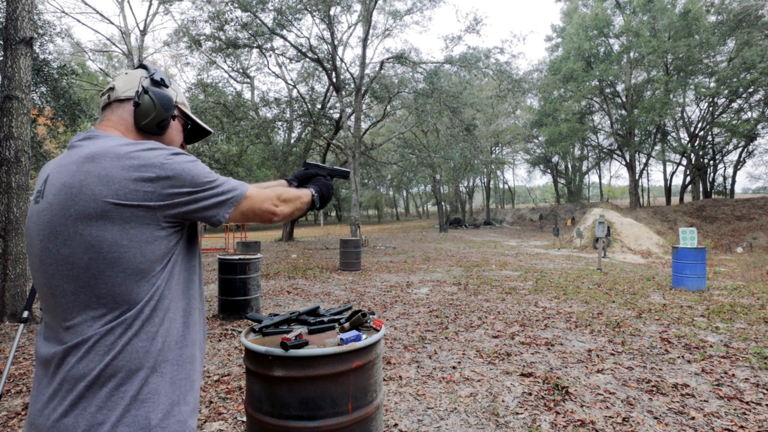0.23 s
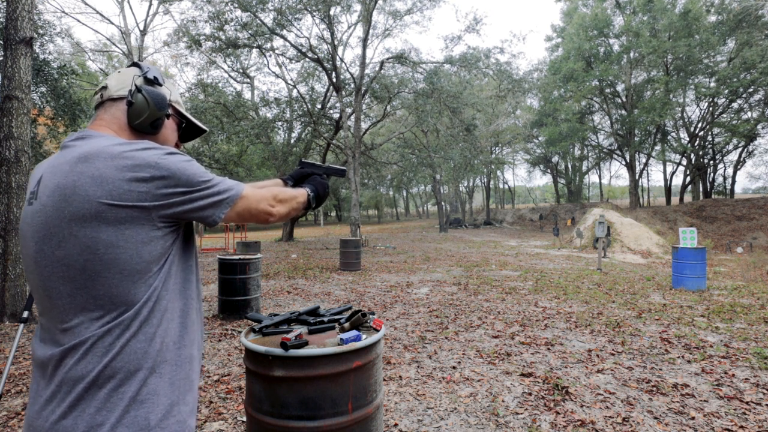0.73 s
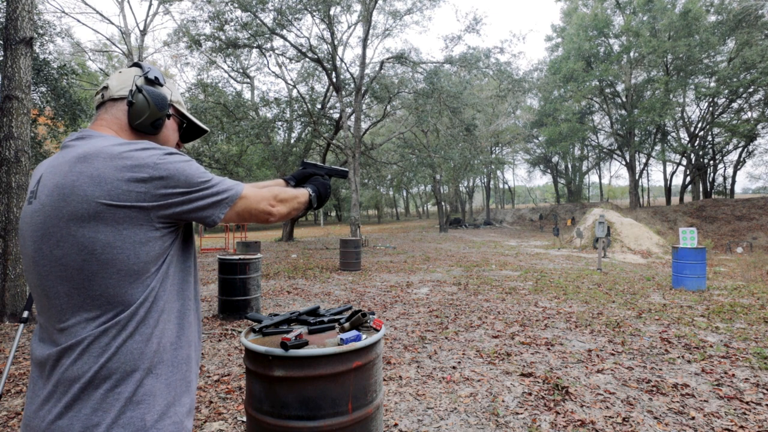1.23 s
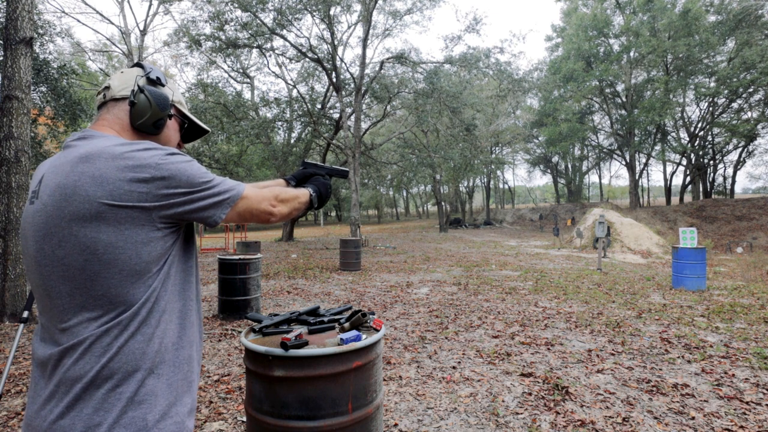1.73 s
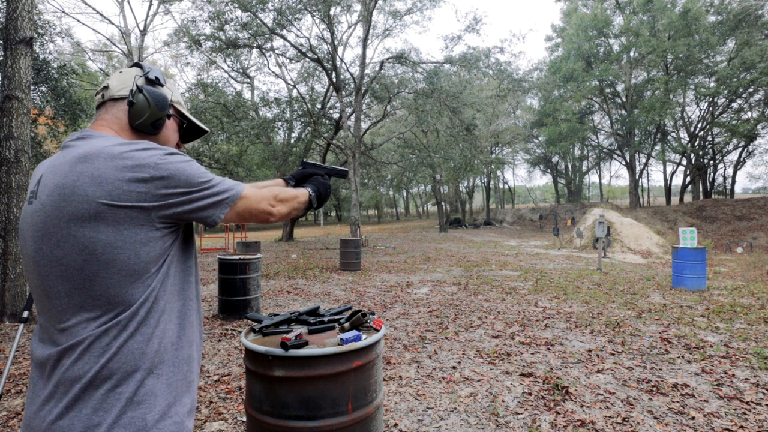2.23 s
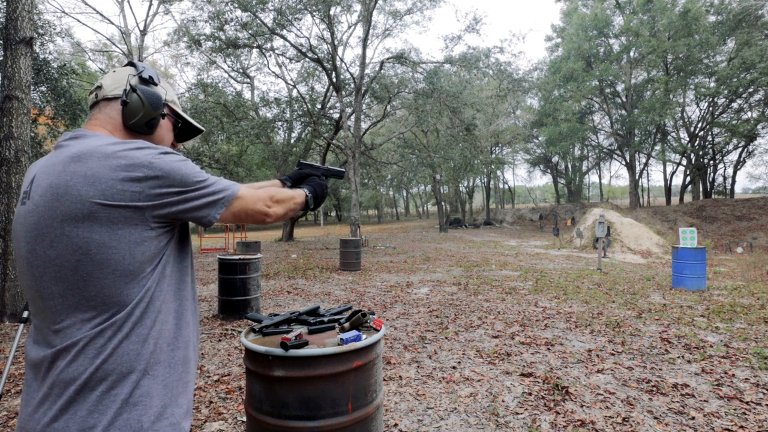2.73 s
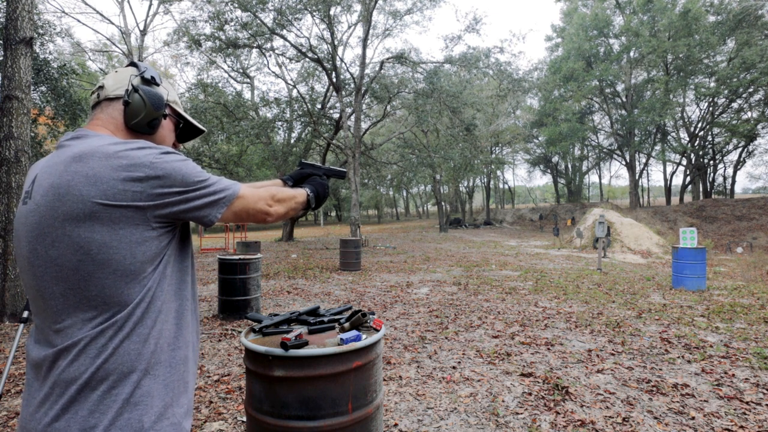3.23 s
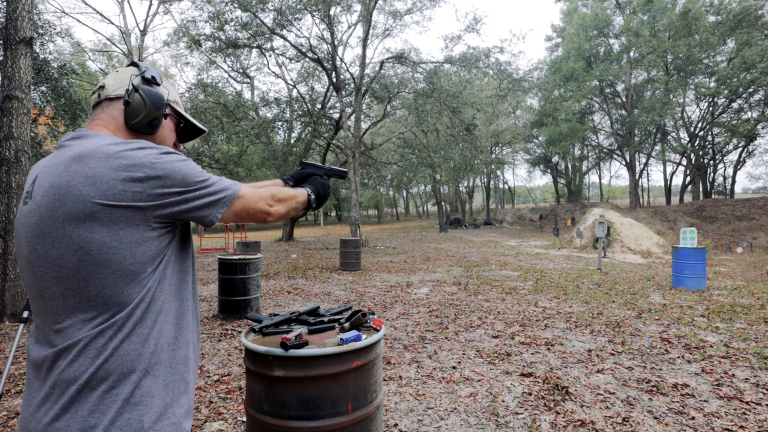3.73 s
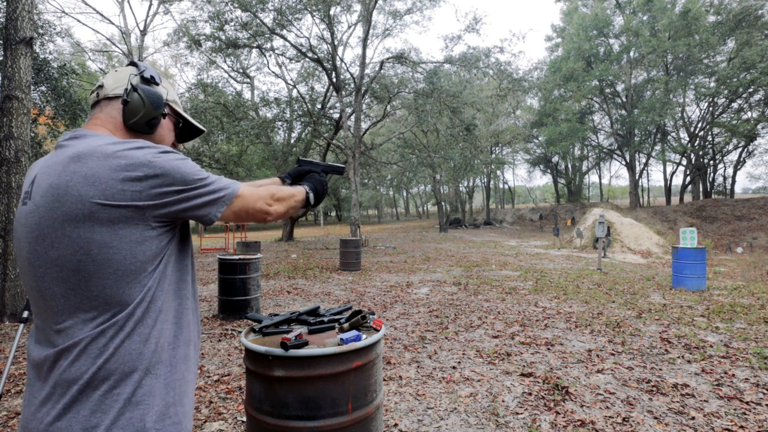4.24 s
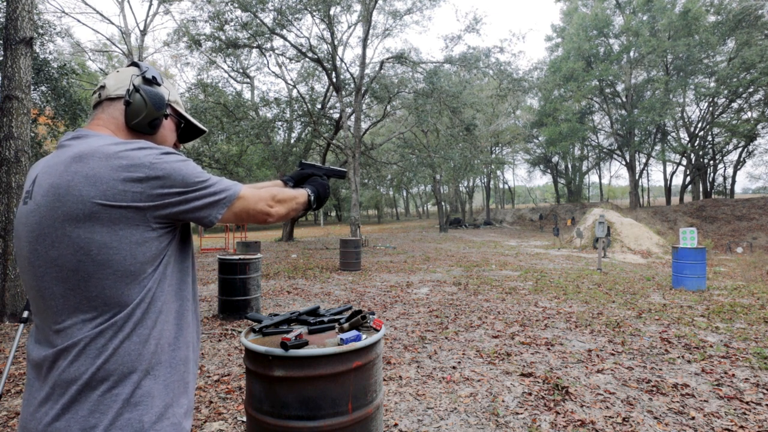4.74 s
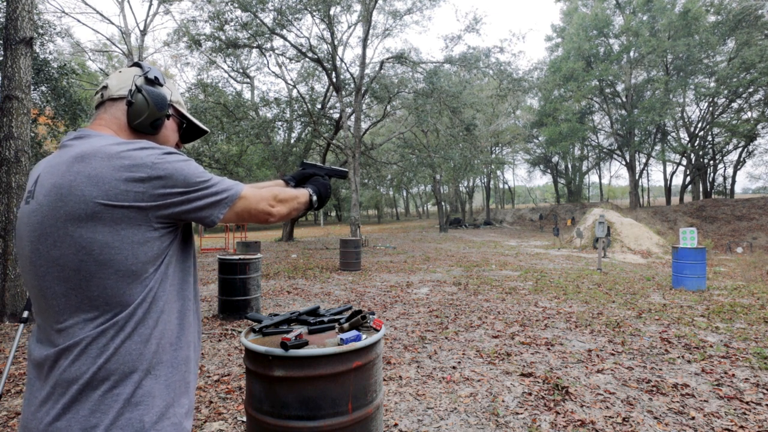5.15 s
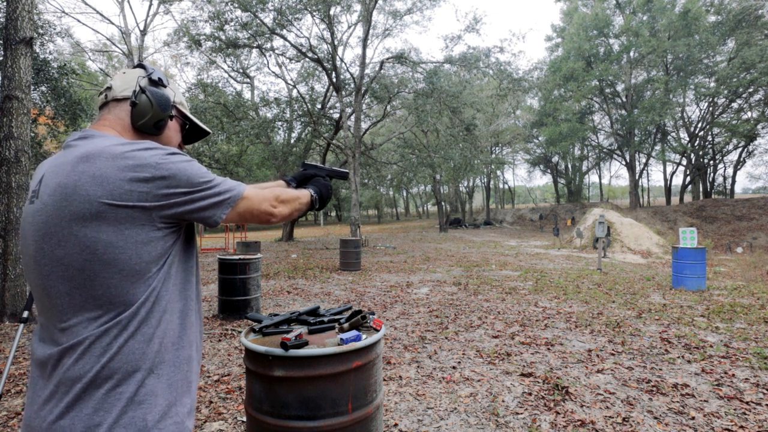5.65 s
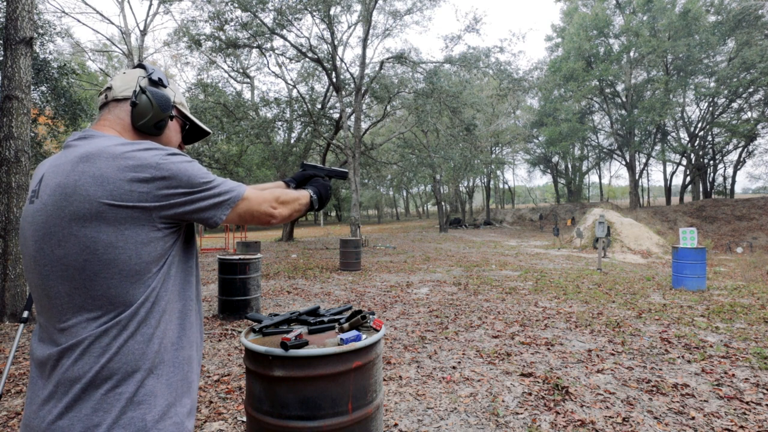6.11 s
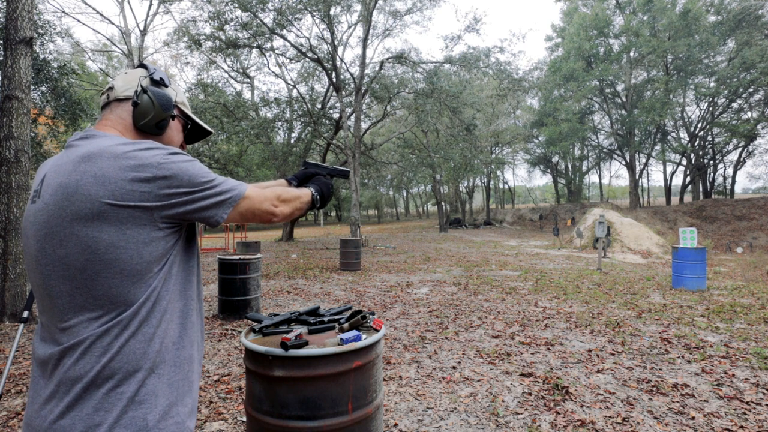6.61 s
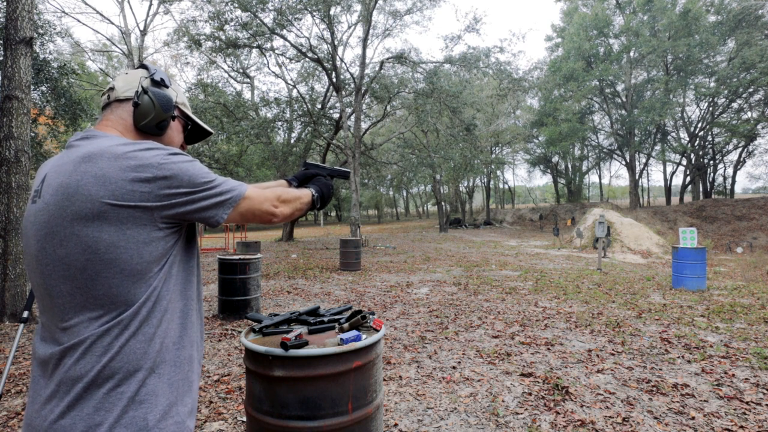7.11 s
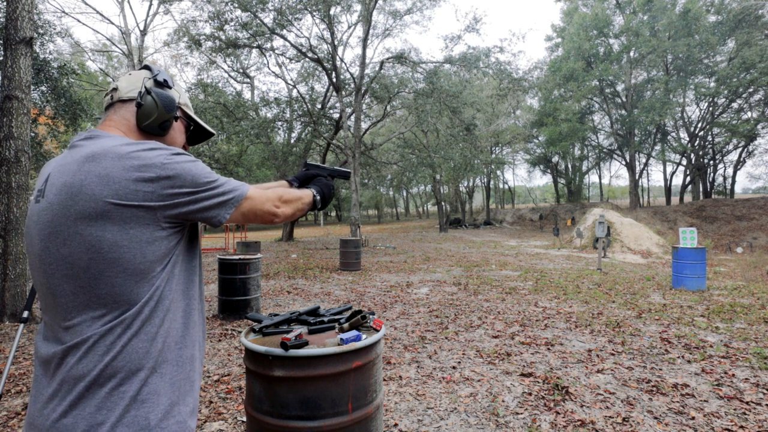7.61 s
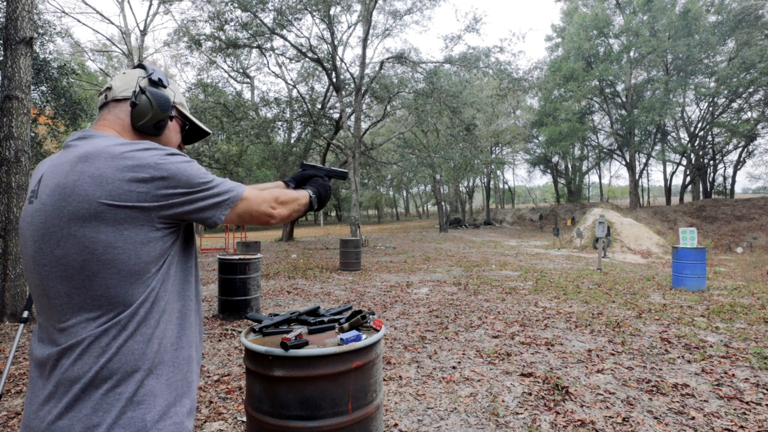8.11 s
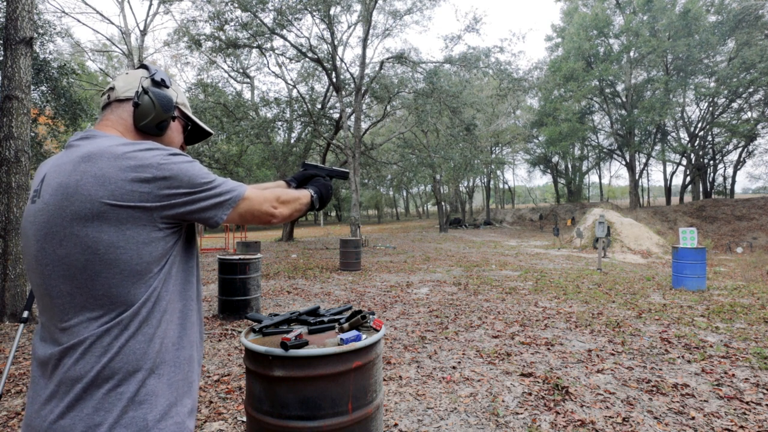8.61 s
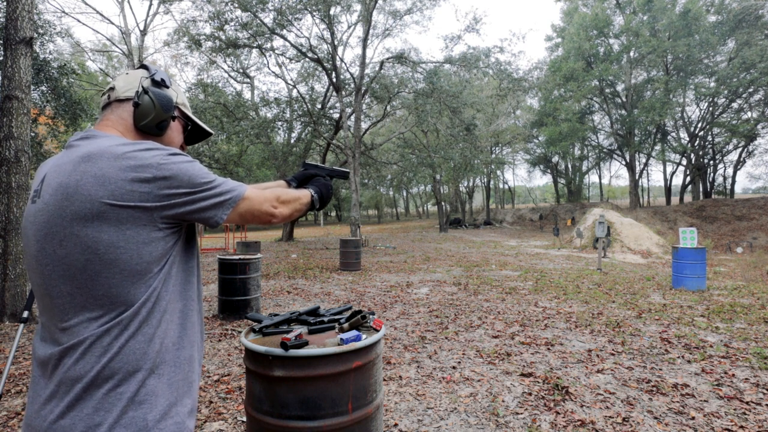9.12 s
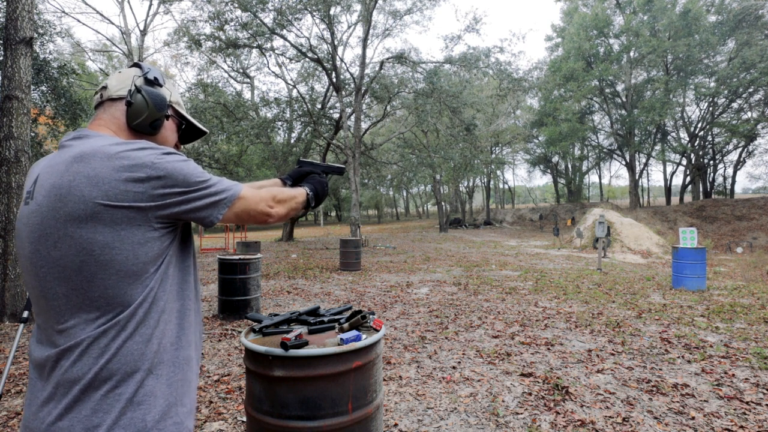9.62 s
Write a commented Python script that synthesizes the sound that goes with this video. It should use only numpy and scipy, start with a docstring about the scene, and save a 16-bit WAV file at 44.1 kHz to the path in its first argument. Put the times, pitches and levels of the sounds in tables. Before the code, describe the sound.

Outdoors among trees, a soft distant wash and low breeze open the scene, with slight cloth rustle and a tiny click near 0.4 s. At 0.6 s a pistol fires a step from the microphone: a violent, clipped crack with a low thump and short hollow metallic ring. Quick slaps return from nearby hard surfaces, a bright bullet smack lands about 0.15 s later, and a dense woodland echo swells, then darkens and fades over a second or so. The breeze dies away. Similar single shots follow at about 2.5, 4.2, 5.8, 7.8 and 9.5 s, the last tail still rolling at the end. Between them are faint trigger clicks, clearest around 3.5 s, grainy sleeve rustles near 1.5, 5.1, 6.7 and 9.0 s, and a two-part shoe scuff in dry leaves at 7.2-7.3 s.

```python
"""On an outdoor range ringed by trees, six slow pistol shots are fired a step away from the microphone.
Each blast is a decaying noise shock with ringing modes, and it overloads the input; the bullet's smack is a
noise burst. Trunks, foliage and earth banks return delayed pulses and swelling, treble-losing noise.
Before and between shots come trigger clicks (short noise ticks), grainy cloth rustle and a shoe scuffing
leaves, over a quiet wash of coloured noise in the trees and a low breeze that soon dies away."""
import sys
import numpy as np
from scipy import signal
from scipy.fft import rfft, irfft, next_fast_len
from scipy.io import wavfile
from scipy.ndimage import map_coordinates

SR = 44100
rng = np.random.default_rng(int(sys.argv[2]) if len(sys.argv) > 2 else 0)


def store_pcm(level_fs):
    """Save levels as 16-bit WAV."""
    pcm = np.round(np.clip(level_fs, -1, 1) * 32767).astype(np.int16)
    wavfile.write(sys.argv[1], SR, np.atleast_2d(pcm).T)


N = 435263  # length in samples


def amp(db):
    """Decibel law: level to amplitude gain."""
    return 10 ** (np.asarray(db) / 20)


def unit(x):
    """Normalisation to an rms of 1."""
    return x / np.sqrt(np.mean(x ** 2) + 1e-20)


def along(points, hz):
    """Logarithmic frequency scale: interpolate (f/Hz, value) points on it."""
    f, v = np.transpose(points)
    return np.interp(np.log(hz + 1), np.log(f + 1), v)


def filtered(x, response):
    """Linear filtering: multiply the spectrum of x by a function of frequency."""
    size = next_fast_len(len(x) + SR // 2)
    hz = np.fft.rfftfreq(size, 1 / SR)
    return irfft(rfft(x, size) * response(hz), size)[:len(x)]


def coloured(x, spectrum):
    """Spectral shaping: weight x by a table of levels, then set its rms to 1."""
    return unit(filtered(x, lambda hz: amp(along(spectrum, hz))))


def fading(x, loss, size):
    """Frequency-dependent damping: each frequency of x falls by loss(Hz) dB a second."""
    hz, t, z = signal.stft(x, SR, nperseg=size)
    damped = z * amp(-loss(hz)[:, None] * t)
    return signal.istft(damped, SR, nperseg=size)[1][:len(x)]


def wobble(count, rate):
    """Slow random modulation: a smooth curve through rate random knots a second."""
    knots = rng.standard_normal(int(count * rate / SR) + 4)
    return map_coordinates(knots, [np.arange(count) * rate / SR])


def swell(t, middle, half):
    """Gaussian envelope: a bell-shaped rise and fall."""
    return np.exp(-.5 * ((t - middle) / half) ** 2)


def add(track, s, sound):
    """Superposition: mix a sound into the track from time s."""
    part = track[max(round(s * SR), 0):][:len(sound)]
    part += sound[:len(part)]


# Shots and their bullets' impacts: t/s, blast level/dB, echo level/dB, smack delay/s, smack level/dB
SHOT_EVENTS = [(0.6281, -4.5, 0, 0.17, -12), (2.523, -4, 0, 0.15, -23), (4.231, -5, -0.5, 0.15, -17),
               (5.7935, -5, -1.5, 0.15, -13), (7.7862, -4.5, -0.5, .15, -9.5),
               (9.5282, -5, -0.5, 0.15, -11)]
# Nearest hard reflectors, drums and big trunks: delay t/s, level/dB
HARD_REFLECTORS = [(0.0299, -0.5), (0.0425, -5.5), (0.112, -6.5), (.187, -2)]


def pistol(clump_db=1.0, lump_db=1.04, spiky=0.37):
    """Superposition of direct sound and reflections: every shot with all that answers it."""
    out = np.zeros(N)
    near = rng.standard_normal(SR // 5)  # close reflections shared by all shots
    count = 2 * SR
    # trunks stand in clumps, a few thick ones among many thin ones
    clumps = amp(clump_db * wobble(count, rate=290) + lump_db * wobble(count, rate=45))
    thickness = np.exp(spiky * rng.standard_normal(count))
    trunks = unit(clumps * thickness * rng.standard_normal(count))
    reflectors = HARD_REFLECTORS + lesser_trunks()
    for s, blast_db, echo_db, smack_delay, smack_db in SHOT_EVENTS:
        add(out, s - .003, striker())
        add(out, s, amp(blast_db) * blast(near))
        add(out, s, amp(echo_db) * woods(trunks))
        add(out, s, amp(echo_db) * (foliage() + banks()))
        add(out, s + smack_delay, amp(smack_db) * smack())
        for lag, db in reflectors:
            add(out, s + lag, amp(db + rng.normal()) * slap(lag))
    return out


# Spectrum of the muzzle blast, also used by the smack: f/Hz, level/dB per Hz
BLAST_SPECTRUM = [(30, -17.5), (70, -24), (150, -5), (290, 0), (480, -2), (900, -5), (1700, -3.5),
                  (2200, 0), (4500, -7), (7500, -8), (8400, -8.5), (9600, -16), (15500, -19)]
# Decay of the blast among nearby things: f/Hz, 60 dB decay time t/s
BLAST_T60 = [(100, 0.088), (450, .06), (2000, 0.033), (8000, .033), (15000, 0.041)]
# Ringing modes of the gun and the drum, plus a bright line near 8.4 kHz: f/Hz, level/dB, 60 dB decay time t/s
RING_MODES = [(318, -17, 0.015), (447.2, -12, 0.13), (827, -14.5, 0.15), (1305, -15.5, 0.07),
              (1508, -10.5, 0.089), (2028, -9.5, 0.058), (2666, -11.5, .045), (3270, -17, 0.078),
              (4590, -17.5, 0.094), (5620, -18, 0.024), (8370, -12, 0.056)]


def blast(near, crack_db=9, ring_db=2.5, own=0.36, front_db=17, front_t60=0.0084):
    """Shock radiation and modal decay: a bright front, a mostly repeated rattle and a short ring."""
    t = np.arange(len(near)) / SR
    front = amp(front_db - 60 * t / front_t60) * rng.standard_normal(len(t))
    # own: share of noise that is new in each shot
    crack = coloured(near + own * rng.standard_normal(len(t)), BLAST_SPECTRUM)
    crack = fading(crack, lambda hz: 60 / along(BLAST_T60, hz), size=128)
    ring = np.zeros(len(t))
    for hz, db, t60 in RING_MODES:
        ring += amp(db + rng.normal() - 60 * t / t60) * np.sin(2 * np.pi * hz * t)
    return front + amp(crack_db) * crack + amp(ring_db) * ring


def striker(level_db=-29, hz=3000, width_hz=2500):
    """Impact excitation: the firing pin snaps forward an instant before the blast."""
    noise = rng.standard_normal(SR // 200)
    tick = filtered(noise, lambda f: 1 / (1 + ((f - hz) / width_hz) ** 2))
    return amp(level_db) * unit(tick)


def smack(t60=0.033):
    """Impact and exponential decay: the bullet hits downrange with a short bright crack."""
    t = np.arange(SR // 10) / SR
    return coloured(rng.standard_normal(len(t)), BLAST_SPECTRUM) * amp(-60 * t / t60)


def lesser_trunks(count=9, near_s=.04, far_s=.38, level_db=-10, fall_db_per_s=20):
    """Spreading loss: trunks at random delays, fainter with distance, as rows of (delay s, dB)."""
    places = (np.arange(count) + rng.random(count)) / count
    lags = near_s + (far_s - near_s) * places
    return [(lag, level_db - fall_db_per_s * lag) for lag in lags]


# Loss along the sound's path, for the hard reflections and the woods: f/Hz, loss level/dB per s
PATH_LOSS = [(60, 10.5), (160, 4), (290, 16), (550, 2), (1100, -0.5), (2000, 1), (4000, 7.5), (8000, 25),
             (15000, 47)]


def slap(lag, width_s=0.00048, blur=0.0003):
    """Specular reflection: a steep front, then a swing the other way; longer and duller from afar."""
    u = np.arange(SR // 50) / SR / (width_s + blur * lag)  # time in pulse widths
    pulse = (u - 1) * np.exp(-u)
    return filtered(pulse, lambda hz: amp(-2 * lag * np.maximum(along(PATH_LOSS, hz), 0)))


# Spectrum of the echo from the woods: f/Hz, level/dB per Hz
WOODS_SPECTRUM = [(25, -51), (55, -30.5), (95, -12.5), (160, -5.5), (240, -7.5), (330, -1.5), (480, 3),
                  (780, 2.5), (1050, 0), (1450, -6), (2300, -6), (5000, -11), (8400, -11.5), (10000, -19),
                  (15500, -24.5)]


def woods(trunks, drift=1.2, stir=.35):
    """Multiple scattering: the same trunks answer every shot; moving air shifts their delays (samples)."""
    count = len(trunks)
    t = np.arange(count) / SR
    delays = np.arange(count) + drift * wobble(count, rate=25)
    paths = map_coordinates(trunks, [delays], mode="nearest")
    echo = coloured(paths + stir * rng.standard_normal(count), WOODS_SPECTRUM)
    # distance eats the treble
    return fading(echo, lambda hz: along(PATH_LOSS, hz), size=512) * answer(t)


# Stands of trees, each swelling and dying away: delay t/s, level/dB, fall in level/dB per s
TREE_STANDS = [(.112, -17.5, 170), (.193, -14, 69.5), (.335, -24.5, 91)]


def answer(t, swell_db_per_s=330):
    """Energy summation: ground, stands of trees and deep woods swell, fade and add in power."""
    ground = (0, -21.5, 35)  # scatters at once
    deep = (0.29, -31.5, 23.5)  # rolls on long after
    levels = []
    for delay, db, fall in [ground, *TREE_STANDS, deep]:
        levels.append(db - np.maximum(swell_db_per_s * (delay - t), fall * (t - delay)))
    return np.linalg.norm(amp(levels), axis=0)


def foliage(delay_s=.165, spread_s=0.052, level_db=-25, low_hz=1500, high_hz=7500, spiky=.6):
    """Diffuse scattering: twigs and leaves along the bullet's path return its crack as a bright swell."""
    t = np.arange(SR // 2) / SR
    twigs = rng.standard_normal(len(t)) * np.exp(spiky * rng.standard_normal(len(t)))
    fizz = unit(filtered(twigs, lambda hz: hz / (hz + low_hz) / np.sqrt(1 + (hz / high_hz) ** 6)))
    return fizz * amp(level_db) * swell(t, delay_s, spread_s)


# Earth banks: delay t/s, level/dB
EARTH_BANKS = [(.118, -19), (.2, -21), (.39, -26)]


def banks(middle_hz=500, width_hz=192, spread_s=.007):
    """Selective reflection: soft earth returns only the low middle of the blast, smeared in time."""
    t = np.arange(SR // 2) / SR
    noise = rng.standard_normal(len(t))
    thump = unit(filtered(noise, lambda hz: 1 / (1 + ((hz - middle_hz) / width_hz) ** 4)))
    return thump * sum(amp(db) * swell(t, delay, spread_s) for delay, db in EARTH_BANKS)


# Trigger and grip clicks: t/s, relative level/dB
CLICK_EVENTS = [(0.377, -43), (1.6641, -39), (2.066, -42.5), (2.4717, -39), (3.534, -33), (5.445, -43),
                (6.826, -44), (6.9015, -40), (7.4355, -48), (7.666, -44), (9.3067, -43.5)]
# Spectrum of a click: f/Hz, level/dB per Hz
CLICK_SPECTRUM = [(400, -25), (2500, -15), (4500, 1.5), (7500, -1.5), (10000, -4), (15500, -12)]


def trigger(t60=0.012, offset_db=-1, rattle_db=-14, rattle_t60=.05):
    """Impact with two decay rates: resetting and taking up slack, a sharp tick and a faint frame rattle."""
    out, t = np.zeros(N), np.arange(SR // 10) / SR
    shape = amp(-60 * t / t60) + amp(rattle_db - 60 * t / rattle_t60)
    for s, db in CLICK_EVENTS:
        click = coloured(rng.standard_normal(len(t)), CLICK_SPECTRUM)
        add(out, s, amp(db + offset_db) * shape * click)
    return out


# The shooter's larger arm movements: middle t/s, relative level/dB, half-length t/s
ARM_MOVES = [(0.13, -62.5, 0.1), (0.453, -57.5, 0.057), (1.488, -57, 0.091), (2.246, -66, 0.083),
             (3.73, -70.5, 0.078), (5.061, -64, 0.046), (5.68, -69.5, 0.09), (6.714, -56.5, 0.04),
             (8.977, -58.5, 0.057)]
# Spectrum of sliding cloth: f/Hz, level/dB per Hz
CLOTH_SPECTRUM = [(500, -29.5), (3000, -7.5), (5500, 1), (8000, -2), (11000, -5), (14000, -7), (16000, -8)]


def clothes(grain_db=3.5, offset_db=4):
    """Stick-slip friction: fabric slides in tiny catches as the shooter moves, settles and grips."""
    t = np.arange(N) / SR
    moves = np.zeros(N)
    for s, db, half in ARM_MOVES:
        settling = amp(-13) * swell(t, s + .19, 0.063)  # the cloth settles after each movement
        moves += amp(db) * (swell(t, s, half) + settling)
    # the gloves tighten before each shot
    grip = amp(-73) * sum(swell(t, s - 0.073, 0.055) for s, *_ in SHOT_EVENTS)
    fidget = amp(-82 + 4 * wobble(N, rate=6))  # faint random stirring throughout
    catches = rng.standard_normal(N) * amp(grain_db * wobble(N, rate=300))
    return amp(offset_db) * (moves + grip + fidget) * coloured(catches, CLOTH_SPECTRUM)


# A shoe shifting in dry leaves: start t/s, level/dB, time to peak t/s
SHOE_SCUFFS = [(7.23, -57, 0.038), (7.312, -48, 0.028)]
# Spectrum of the dry leaves: f/Hz, level/dB per Hz
LEAF_SPECTRUM = [(300, -18), (900, -5), (2200, -2), (4500, -4), (7500, -3.5), (10000, -14), (15000, -22)]


def shoe(grain_db=2):
    """Granular friction: each scuff in the leaves swells quickly and crumbles away."""
    out, t = np.zeros(N), np.arange(SR // 2) / SR
    for s, db, rise in SHOE_SCUFFS:
        grains = rng.standard_normal(len(t)) * amp(grain_db * wobble(len(t), rate=330))
        envelope = t / rise * np.exp(1 - t / rise)
        add(out, s, amp(db) * coloured(grains, LEAF_SPECTRUM) * envelope)
    return out


# Spectrum of the distant wash in the trees: f/Hz, level/dB per Hz
WASH_SPECTRUM = [(25, -15.5), (80, -4), (160, -2), (290, -8.5), (420, -6), (550, 0.5), (640, -7.5),
                 (760, -2), (1100, -5.5), (1500, -12), (2500, -13.5), (4000, -23), (8000, -22.5),
                 (15000, -36)]
# Low rumble of the breeze: t/s, level/dB
BREEZE_LEVELS = [(0, -71), (.25, -65), (.55, -66.5)]


def outdoors(air_db=-60.5, rumble_hz=110, lull_s=0.54, gust_db=3):
    """Turbulent noise: a distant wash in the trees, lifted by a low breeze that soon dies away."""
    t = np.arange(N) / SR
    sway = amp(.8 * wobble(N, rate=3))
    wash = coloured(rng.standard_normal(N), WASH_SPECTRUM) * amp(air_db) * sway
    s, db = np.transpose(BREEZE_LEVELS)
    noise = rng.standard_normal(N)
    rumble = unit(filtered(noise, lambda hz: hz / rumble_hz / (1 + (hz / rumble_hz) ** 4)))
    breeze = np.exp(-np.maximum(t - s[-1], 0) / lull_s)  # steady up to the last table time
    return wash * amp(gust_db * breeze) + rumble * amp(np.interp(t, s, db)) * breeze


def scene():
    """Linear superposition: all sources at one microphone."""
    return (pistol() + trigger() + clothes() + shoe() + outdoors())[None]


def record(dry, top=1.0, top_hz=15800):
    """Non-linear overload: the input clips and its zero line sags for a moment, heard as a low thump."""
    x = dry[0]
    clipped = x / (1 + np.abs(x / top) ** 4) ** (1 / 4)
    overload = np.minimum(np.abs(x - clipped), 1)
    sag, hold_s, recover_hz = .55, .0145, 19

    def sag_response(hz):
        """Moving average and high-pass: hold the overload briefly, then recover."""
        held = np.sinc(hz * hold_s) * np.exp(-1j * np.pi * hz * hold_s)
        return held * (1j * hz / (recover_hz + 1j * hz)) ** 2

    swing = filtered(overload, sag_response)
    out = np.clip(clipped - sag * swing, -.95, .95)
    # low-pass with an edge 400 Hz wide
    return filtered(out, lambda hz: np.clip((top_hz - hz) / 400 + .5, 0, 1))[None]


dry = scene()
out = record(dry)
store_pcm(out)
```